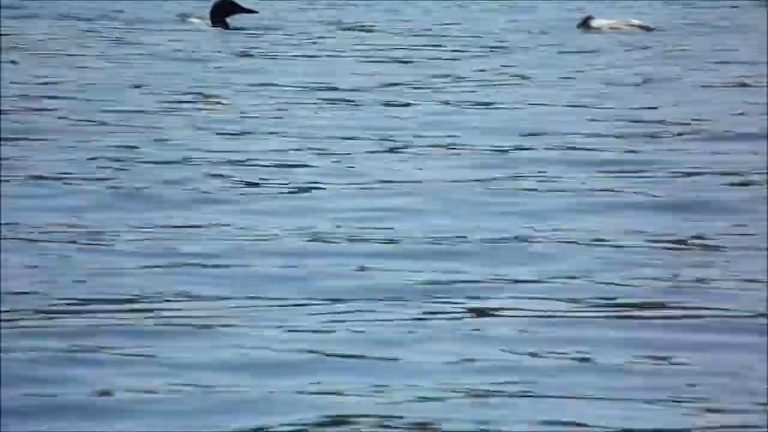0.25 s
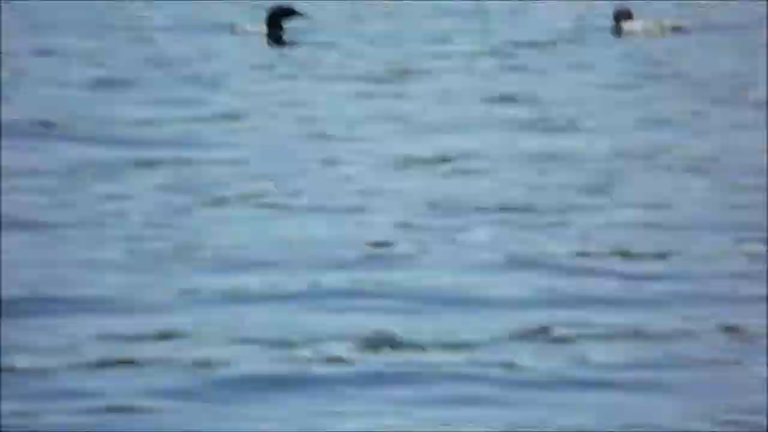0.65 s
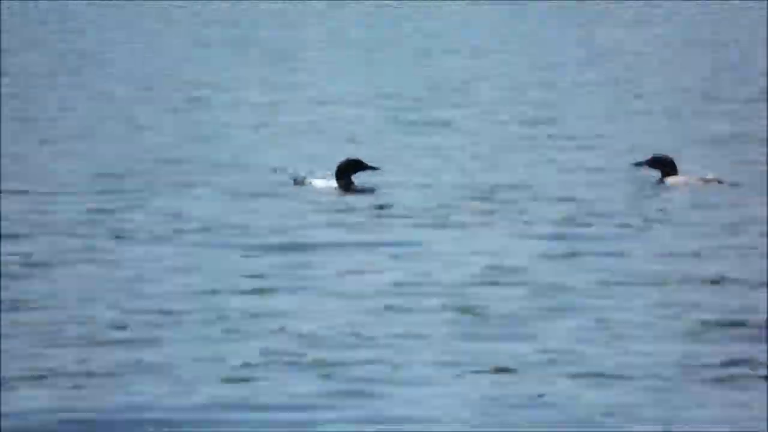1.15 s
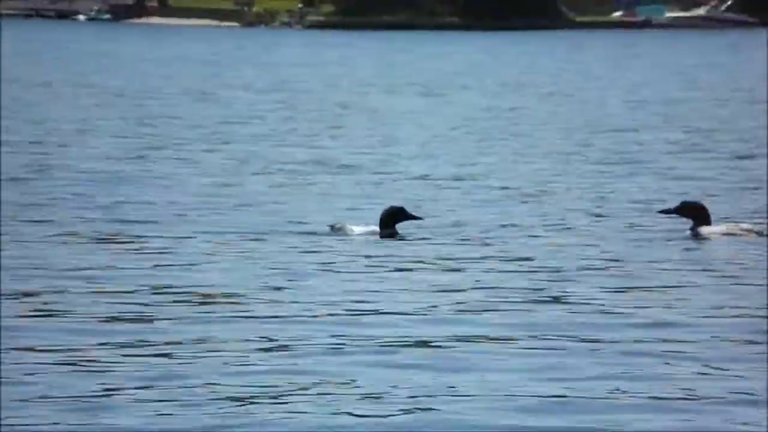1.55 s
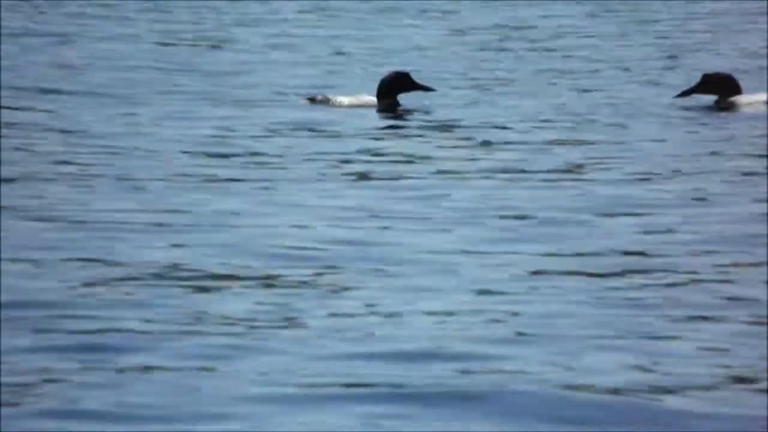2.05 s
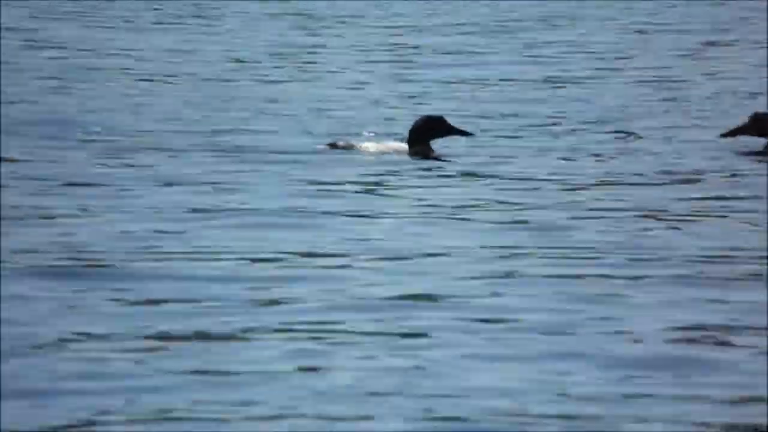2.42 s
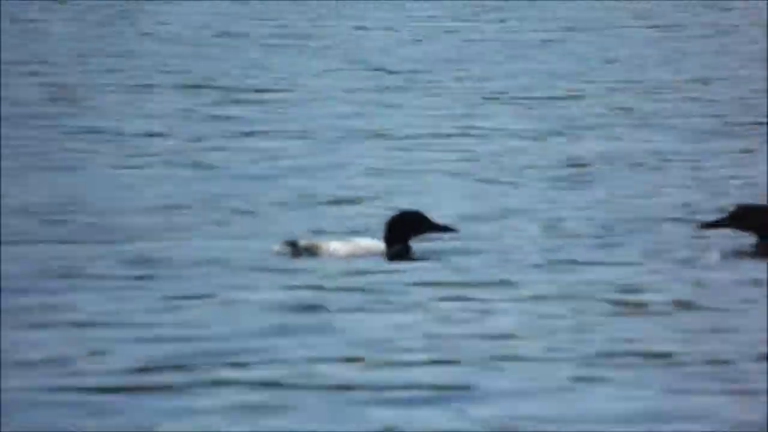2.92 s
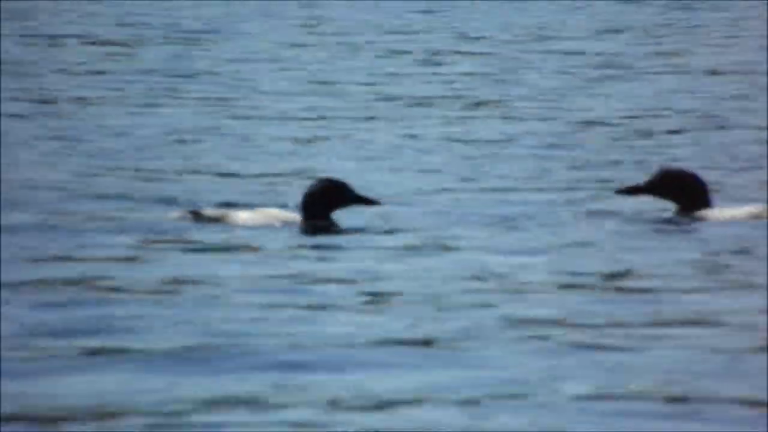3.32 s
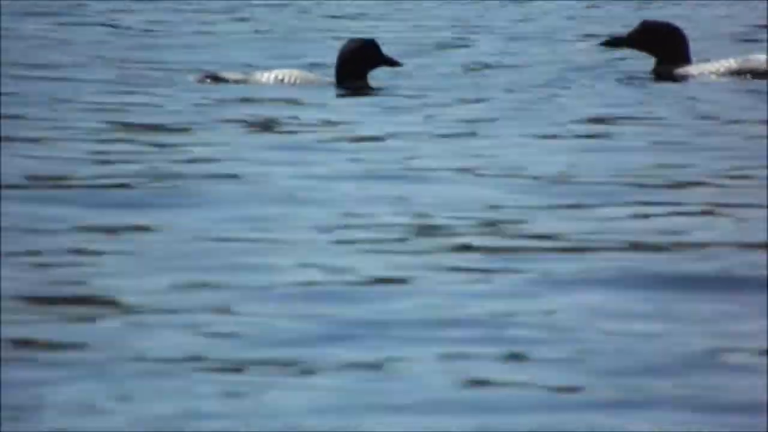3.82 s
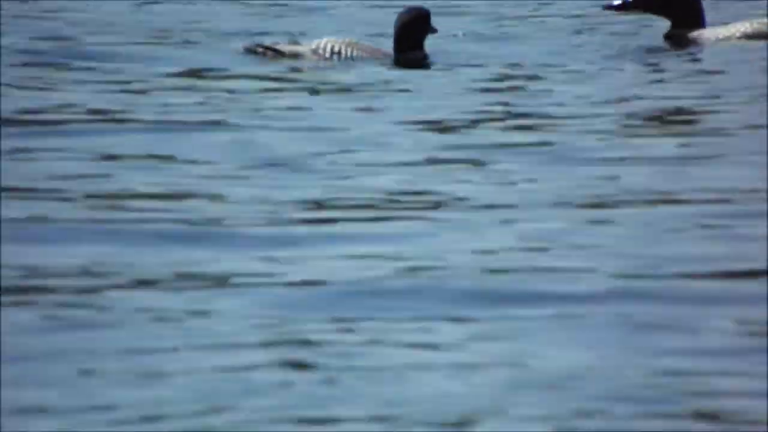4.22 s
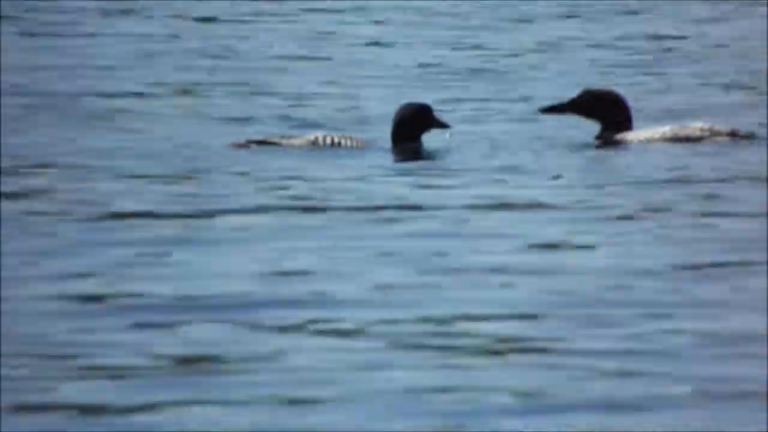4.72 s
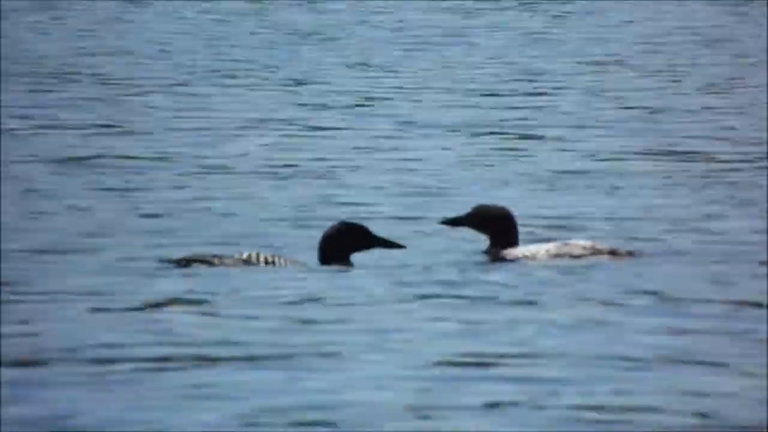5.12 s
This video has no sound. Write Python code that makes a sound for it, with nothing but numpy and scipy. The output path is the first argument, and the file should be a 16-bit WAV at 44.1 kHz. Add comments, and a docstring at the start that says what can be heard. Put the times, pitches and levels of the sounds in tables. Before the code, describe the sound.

Close handling clicks, a buzzing two-second zoom whirr with a throbbing whine, then more sharp clicks above soft electronic hiss.

```python
"""On a boat, a small camera's own microphone: hiss, faint wavering hums and a thin whistle run throughout.
From 0.6 s fingers click the plastic casing (ringing modes), then slide and creak (jerky noise, rows of clicks).
At 1.6 s the zoom jolts and grinds for two seconds (beating noise through resonances), a lens part singing
near 1.2 kHz in throbs. Soft groans, more handling and a low bump follow. No distance or room is added;
one microphone feeds both channels, the left a sample late."""
import sys
import numpy as np
from scipy.fft import rfft, irfft, next_fast_len
from scipy.io import wavfile
from scipy.ndimage import map_coordinates

SR = 44100
rng = np.random.default_rng(int(sys.argv[2]) if len(sys.argv) > 2 else 0)


def transcribe(signal):
    """Save signal, clipped to [-1, 1], as a 16-bit WAV file at the path in sys.argv[1]."""
    frames = np.atleast_2d(signal).T
    limited = np.clip(frames, -1, 1)
    pcm = np.round(limited * 32767).astype(np.int16)
    wavfile.write(sys.argv[1], SR, pcm)


N = 236351
TIME = np.arange(N) / SR  # s


def amp(db):
    """Amplitude factor of a level in dB."""
    return 10 ** (np.asarray(db) / 20)


def unit(x):
    """x scaled to rms 1."""
    return x / np.sqrt(np.mean(x ** 2) + 1e-20)


def sine(turns):
    """Sine of a phase counted in whole turns."""
    return np.sin(2 * np.pi * turns)


def curves(rows):
    """One value per sample for each column after the time."""
    s, *columns = np.transpose(rows)
    return [np.interp(TIME, s, column) for column in columns]


def wobble(rate):
    """A smooth random curve, rate knots a second."""
    knots = rng.standard_normal(int(N * rate / SR) + 4)
    return map_coordinates(knots, [np.arange(N) * rate / SR])


def filtered(x, response):
    """x times a complex response of frequency."""
    m = next_fast_len(N + SR // 2)
    spectrum = rfft(x, m) * response(np.fft.rfftfreq(m, 1 / SR))
    return irfft(spectrum, m)[..., :N]


def colour(points):
    """Gain of (f/Hz, level/dB) points joined on a log frequency axis."""
    f, db = np.transpose(points)
    return lambda hz: amp(np.interp(np.log(hz + 1), np.log(f + 1), db))


def resonance(f, hz, width_hz):
    """One causal resonance of gain 1 at its top."""
    return 1j * f * width_hz / (hz * hz - f * f + 1j * f * width_hz)


def lift(f, peaks):
    """Gain of (f/Hz, width/Hz, level/dB) peaks over a flat response."""
    return 1 + sum((amp(db) - 1) * abs(resonance(f, hz, w)) ** 2 for hz, w, db in peaks)


def noise(response):
    """Noise of rms 1 in the given colour."""
    return unit(filtered(rng.standard_normal(N), response))


# Hiss spectrum: f/Hz, relative level/dB
HISS_COLOUR = [(25, -40), (100, -15), (250, -4.5), (500, -3.5), (800, -1.5), (1300, -6), (1750, -8),
               (2200, -4.5), (2800, -5.5), (3050, -15), (6000, -17.5), (9500, -19), (12000, -19.5),
               (15400, -23)]
# Casing resonances that colour the hiss: f/Hz, width/Hz, level/dB
HISS_RESONANCES = [(2568, 163, 9.5), (3630, 380, 4)]
# Hums, before their wavering: f/Hz, level/dB rms
HUM_TONES = [(308, -71), (772, -75.5), (928, -77.5)]
# Steady whistle: f/Hz, level/dB rms
WHISTLE_TONES = [(9778.7, -64)]
HISS_DB = -59  # rms


def background():
    """Hiss coloured by the casing, wavering hums and the steady whistle of the electronics."""
    hiss = amp(HISS_DB) * noise(lambda f: colour(HISS_COLOUR)(f) * lift(f, HISS_RESONANCES))
    hum = 0
    for hz, db in HUM_TONES:
        level = amp(db + 3.1 * wobble(18)) * np.sqrt(2)
        hum = hum + level * sine(hz * TIME + 0.11 * wobble(14))
    whistle = sum(amp(db) * np.sqrt(2) * sine(hz * TIME) for hz, db in WHISTLE_TONES)
    return hiss + hum + whistle


PULL = .6  # how far a blow draws the nearest mode to its favoured pitch, 0-1


def ring(modes, t, rise, favoured_hz):
    """Modes rise softly and are damped by the grip; the blow favours those near one pitch."""
    struck = 0
    for hz, db, t60 in modes:
        near = np.exp(-(np.log(hz / favoured_hz) / 0.1) ** 2)
        favour_db = 8 * near
        hz = hz * (favoured_hz / hz) ** (PULL * near)
        size, pitch, phase = amp(rng.normal(0, 1.5)), rng.normal(1, .012), rng.normal(0, .25)
        longer_t60 = t60 * amp(0.22 * favour_db)
        decay = amp(db + favour_db - 60 * (t / longer_t60) ** 0.79)
        struck = struck + size * decay * sine(hz * pitch * t + phase)
    struck = struck * (1 - np.exp(-(t / rise) ** 2))
    return struck / np.sqrt(np.mean(struck[t < .008] ** 2))  # rms 1 over the first 8 ms


# Casing clicks, each sounding 1 ms after its time: t/s, level/dB of the upper modes (peak),
# of the middle modes, low modes and bright crack (rms over 8 ms), favoured f/Hz
CASING_CLICKS = [(0.593, -65, -55, -57, -78, 910), (0.7029, -52, -57, -55, -74, 910),
                 (0.8794, -64, -55, -53, -74, 960), (1.028, -23, -32, -38, -63, 2350),
                 (1.3068, -60, -61, -53, -80, 744), (1.3226, -32, -46, -41.5, -70, 725),
                 (1.403, -30.5, -36, -42, -67, 1540), (1.439, -22, -27, -20.5, -38, 780),
                 (1.4934, -38, -42, -54, -62, 1040), (1.513, -25.5, -33, -45, -56.5, 1090),
                 (1.5595, -35, -47.5, -53, -61, 2600), (1.6118, -36, -37, -47, -71, 2550),
                 (1.6297, -18, -23.5, -23.5, -40.5, 1070), (1.6633, -12, -24.5, -31, -47.5, 2530),
                 (1.9828, -25.5, -32, -30, -46, 785), (2.0705, -40, -42, -34, -70, 767),
                 (2.175, -49, -44, -34, -64, 830), (2.9073, -23, -38, -37, -62, 2420),
                 (3.0722, -25, -35.5, -35.5, -57, 1170), (3.1428, -21, -19, -28.5, -50.5, 1195),
                 (3.6366, -29.5, -43.5, -45.5, -58, 2510), (3.895, -52, -64, -51.5, -80, 734),
                 (4.148, -30.5, -32.5, -35.5, -55.5, 1085), (4.2846, -12, -30, -38.5, -38, 2730),
                 (4.318, -41, -45.5, -50, -80, 1420), (4.4566, -12, -20.5, -30.5, -45.5, 1662),
                 (4.603, -45, -54, -52, -72, 910), (4.789, -36, -39, -46, -70, 1380),
                 (4.8479, -38, -44.5, -63, -75, 1610), (4.936, -47.5, -57, -56, -68, 1320),
                 (4.963, -66, -63, -41.5, -77, 890), (5.0091, -46.5, -55, -51, -84, 1850)]
# Modes of the casing, before a blow favours any: f/Hz, relative level/dB, t60/s
LOW_CASING = [(225, -7, 0.05), (337, 4.5, 0.029), (531, -18, 0.18), (678, 14.5, 0.017), (848, 14.5, 0.019)]
MIDDLE_CASING = [(1049, 10, 0.012), (1192, 2.7, 0.032), (1320, 1.7, 0.023), (1502, 0.85, 0.032),
                 (1565, 1, 0.027)]
UPPER_CASING = [(1887, -10.5, 0.02), (2129, -1.5, 0.014), (2357, -4, 0.022), (2618, -0.5, 0.014),
                (2977, -10, 0.019)]
CRACK_CASING = [(3576, 5.5, 0.02), (3950, 9, 0.011), (4550, 7, 0.01), (5170, 3.5, 0.013),
                (6380, 3.5, 0.0086), (8140, 6, 0.004)]
LOW_CUT_HZ = 200


def clicks():
    """Each click shakes four groups of casing modes in its own balance; the thin casing sheds no bass."""
    out, t = np.zeros(N + SR), np.arange(SR // 10) / SR
    for s, upper_db, middle_db, low_db, crack_db, hz in CASING_CLICKS + slips():
        upper = ring(UPPER_CASING, t, 0.0014, hz)
        click = amp(upper_db) * upper / np.abs(upper).max()
        click += amp(low_db) * ring(LOW_CASING, t, 0.00066, hz)
        click += amp(middle_db) * ring(MIDDLE_CASING, t, 0.0014, hz)
        click += amp(crack_db) * ring(CRACK_CASING, t, 0.00073, hz)
        out[round((s + .001) * SR):][:len(t)] += click
    return filtered(out[:N], lambda f: (1j * f / (1j * f + LOW_CUT_HZ)) ** 3)


# Finger strokes on the casing: loudest t/s, rise/s, fall/s, dull slide level/dB, bright scrape level/dB
FINGER_STROKES = [(1.41, .3, 0.11, -67, -64), (1.45, 0.041, 0.06, -46.5, -49), (4.26, 0.16, 0.23, -56, -55),
                  (4.929, 0.31, 0.36, -54.5, -83)]
# Spectrum of the dull slide: f/Hz, relative level/dB
SLIDE_COLOUR = [(40, -23), (300, 9), (900, 8), (1300, 10), (1800, -31), (4000, -61)]
STROKE_SPAN_DB = 20  # what a stroke gains in its rise and loses in its fall


def fingers():
    """Skin slips in small jerks over the plastic, dull or scraping the casing's upper resonance."""
    slide_gain = scrape_gain = 0
    for s, rise, fall, slide_db, scrape_db in FINGER_STROKES:
        shape_db = -STROKE_SPAN_DB * np.maximum((s - TIME) / rise, (TIME - s) / fall)
        slide_gain = slide_gain + amp(slide_db + shape_db)
        scrape_gain = scrape_gain + amp(scrape_db + shape_db)
    jerks = amp(3 * wobble(76))
    slide = unit(jerks * noise(colour(SLIDE_COLOUR)))
    scrape = unit(jerks * noise(lambda f: resonance(f, 2570, 900) ** 2))
    return slide_gain * slide + scrape_gain * scrape


# Creaks, a seam or the gear slack slipping in quick steps: t/s, number of slips, gap/s,
# upper level/dB, middle level/dB, low level/dB, loss/dB per slip, favoured f/Hz
CREAK_ROWS = [(1.3472, 2, 0.017, -37.5, -50.5, -47.5, -1.5, 2470),
              (1.4524, 6, .0068, -34.5, -35.5, -42, 1.5, 1030),
              (1.523, 3, .0126, -38.5, -46.5, -56, 1, 1100), (1.6978, 5, 0.012, -38, -50, -74, 2, 2550)]
SLIP_CRACK_DB = -29  # bright crack relative to the upper modes


def slips():
    """Each creak is a row of fading or growing, slightly uneven clicks."""
    rows = []
    for s, count, gap, upper_db, middle_db, low_db, loss_db, hz in CREAK_ROWS:
        for k in range(round(count)):
            uneven = k > 0  # the first slip is exact
            late = (k + uneven * rng.normal(0, .04)) * gap
            db = -loss_db * k + uneven * rng.normal(0, 1.5)
            crack_db = upper_db + db + SLIP_CRACK_DB
            rows.append((s + late, upper_db + db, middle_db + db, low_db + db, crack_db, hz))
    return rows


# Gain of the steady singing: t/s, level/dB
SINGING_LEVEL = [(1.7, -91), (1.9, -44.5), (2.3, -51), (2.8, -45), (3.15, -50.5), (3.3, -32.5),
                 (3.42, -46.5), (3.48, -37.5), (3.55, -50.5), (3.6, -40.5)]
START_S, STOP_S, REST_S = 1.61, 3.487, 3.638  # motor starts, loses power, lens comes to rest
JOLT_DB, JOLT_FADE_DB_PER_S = -26.5, 185  # the gears take up their slack loudly
RUN_DB, COAST_DB = -38.5, -56.5  # gear noise under power and while coasting
SPIN_UP_S, SPUN_UP_S = 1.725, 1.75  # the steady gear noise rises between these times
EDGE_S, REST_FADE_DB_PER_S = 0.005, 600  # length of abrupt changes; the last fade
RUB_DB, RUB_FOLLOWS = -46, 0.24  # rubbing at the loudest singing; share of the singing's dB swings
RUB_JOLT_DB = -10  # rubbing relative to the jolt


def motor():
    """Gear, singing and rubbing gains: a jolt, a spin-up, a steady run, a coast and the rest."""
    ramp = lambda s, length: np.clip((TIME - s) / length, 0, 1)
    moving = ramp(START_S, EDGE_S) * amp(-REST_FADE_DB_PER_S * np.maximum(TIME - REST_S, 0))
    jolt = amp(JOLT_DB - JOLT_FADE_DB_PER_S * np.maximum(TIME - START_S, 0))
    run_db = RUN_DB + (COAST_DB - RUN_DB) * ramp(STOP_S, EDGE_S)
    run = amp(run_db) * ramp(SPIN_UP_S, SPUN_UP_S - SPIN_UP_S)
    sing_db, = curves(SINGING_LEVEL)
    rub = amp(RUB_DB + RUB_FOLLOWS * (sing_db - sing_db.max())) + amp(RUB_JOLT_DB) * jolt
    return moving * (jolt + run), moving * amp(sing_db), moving * rub


# Barrel resonances shaken by the gears: f/Hz, width/Hz, level/dB
GEAR_RESONANCES = [(1196, 154, -5), (1643, 58, -5.5), (1784, 33, -12), (2405, 109, -2), (2553, 126, -8.5),
                   (2898, 118, -8), (3800, 106, -30.5), (4630, 59, -26)]


def barrel(f):
    """Resonances of alternating sign, each narrow one shaped by one six times as wide."""
    response = 0
    for k, (hz, width, db) in enumerate(GEAR_RESONANCES):
        response = response + (-1) ** k * amp(db) * resonance(f, hz, width) * resonance(f, hz, 6 * width)
    return response


# Gear beats, before a small wander: t/s, beats per second
BEAT_RATE = [(2.3, 98.5), (2.45, 93), (3.25, 93.5), (3.45, 98)]
# Broad gear noise: f/Hz, relative level/dB
GRIND_COLOUR = [(60, -39), (900, -18.5), (2000, -3.5), (3000, -10), (3400, -15.5), (5500, -32.5),
                (9000, -32), (15000, -73)]
# Gear tone, one row: f/Hz, level/dB relative to the gear noise, depth of its pulsing with the beats (0-1)
GEAR_WHINE = (2420, -14, .7)
# Low rubbing: f/Hz, relative level/dB
RUB_COLOUR = [(40, -41), (200, -13.5), (420, -11.5), (900, -11), (1050, -25), (1500, -45.5)]
# Hollows of the barrel: f/Hz, width/Hz, level/dB
BARREL_HOLLOWS = [(512, 87, 7.5), (710, 125, 8)]
RUB_THROB_DB = -25.5  # each throb shakes the barrel too


def zoom_drive():
    """Gear teeth rattle in beats into the lens barrel; one part sings; the barrel rubs low."""
    gear_gain, sing_gain, rub_gain = motor()
    turns = np.cumsum(curves(BEAT_RATE)[0] * (1 + .025 * wobble(30))) / SR  # one turn a beat
    beat = .5 + np.exp(-3 * (turns % 1)) * amp(1.5 * wobble(90))  # starts sharply and fades
    rattle = beat * rng.standard_normal(N)
    knocks = np.diff(np.floor(turns), prepend=0) * amp(1.5 * wobble(90))  # one firm contact a beat
    teeth = unit(rattle) + amp(-7) * unit(knocks)
    # the next wheel chatters twice in three beats
    chatter = (1 + .55 * sine(turns * 2 / 3)) * amp(2.5 * wobble(250))
    grind = unit(chatter * filtered(rattle, colour(GRIND_COLOUR)))
    gears = unit(unit(filtered(teeth, barrel)) + amp(-9.0) * grind)
    whine_hz, whine_db, depth = GEAR_WHINE
    whine = sine(np.cumsum(whine_hz * (1 + .012 * wobble(25))) / SR)
    pulsing = 1 + depth * np.cos(2 * np.pi * turns)
    gears = unit(gears + amp(whine_db) * unit(whine * pulsing))
    rub_noise = noise(lambda f: colour(RUB_COLOUR)(f) * lift(f, BARREL_HOLLOWS))
    rubbing = unit(amp(2 * wobble(50)) * rub_noise)
    rub_gain = rub_gain + amp(RUB_THROB_DB) * throbs()
    return gear_gain * gears + singing(sing_gain, turns) + rub_gain * rubbing


SING_HZ, SING_WIDTH_HZ = 1179, 24


def singing(level, turns):
    """A wandering tone sings and throbs; narrow noise, slightly stronger, roughens the steady singing."""
    tone = sine(np.cumsum(SING_HZ * (1 + 0.00589 * wobble(40))) / SR)
    rough = noise(lambda f: resonance(f, SING_HZ, SING_WIDTH_HZ) * resonance(f, SING_HZ, 300))
    steady = unit(amp(6.7 * wobble(29.8)) * tone) + amp(2) * rough
    flutter = 1 + .4 * sine(turns / 3)  # once in three beats
    return level * unit(steady * flutter) + throbs() * tone


# Throbs of the singing part, before the damping at rest: start t/s, peak level/dB
SINGING_THROBS = [(2.328, -31.5), (2.62, -34.5), (2.865, -27.5), (2.933, -24), (2.963, -28), (2.996, -25.5),
                  (3.075, -29), (3.128, -27.5), (3.193, -27), (3.239, -26), (3.267, -24.5), (3.292, -29.5),
                  (3.461, -31), (3.516, -43), (3.563, -33.5), (3.628, -31.5)]
REST_DAMP_DB = -12  # the stop damps the singing part at once


def throbs(rise=0.0086, t60=0.075):
    """The singing part swells within milliseconds and rings out: its peak size over time."""
    swells, t = np.zeros(N + SR), np.arange(SR // 4) / SR
    swell = np.sin(np.pi / 2 * np.clip(t / rise, 0, 1)) ** 2
    shape = swell * amp(-60 * np.maximum(t - rise, 0) / t60)
    for s, db in SINGING_THROBS:
        swells[round(s * SR):][:len(t)] += amp(db) * shape
    return amp(REST_DAMP_DB * (TIME > REST_S)) * swells[:N]


# Short soft tones, before their unsteadiness: middle t/s, half length/s, f/Hz, peak level/dB
SOFT_GROANS = [(3.194, 0.0043, 760, -34.5), (3.607, 0.018, 285, -42.5), (4.912, 0.003, 450, -43),
               (4.954, 0.0025, 340, -40), (4.956, 0.0038, 885, -32)]


def groan():
    """Barrel or grip presses the casing: each soft tone swells and fades."""
    unsteady = amp(4 * wobble(150))
    tones = 0
    for s, half, hz, db in SOFT_GROANS:
        tones = tones + amp(db) * np.exp(-((TIME - s) / half) ** 2) * sine(hz * TIME)
    return unsteady * tones


# Grip shift, one row: middle t/s, half length/s, f/Hz, level/dB before its lumps
GRIP_BUMP = (4.97, .07, 110, -62)


def bump():
    """The grip shifts: a short swell of lumpy low noise."""
    s, half, hz, db = GRIP_BUMP
    rumble = noise(lambda f: resonance(f, hz, 1.9 * hz))
    swell = np.exp(-((TIME - s) / half) ** 2)
    return amp(db + 4.6 * wobble(27)) * swell * rumble


def scene():
    """All sounds at one microphone, fed to both channels with the left a sample late."""
    mono = background() + clicks() + fingers() + zoom_drive() + groan() + bump()
    return np.array([np.roll(mono, 1), mono])


CEILING = .36  # amplitude that the soft clipping approaches
NOTCH_HZ, NOTCH_WIDTH_HZ, TOP_HZ = 6992, 90, 15650


def record(dry):
    """The loudest clicks clip softly; a narrow notch near 7 kHz, and nothing above TOP_HZ."""
    clipped = dry / (1 + np.abs(dry / CEILING) ** 6) ** (1 / 6)
    return filtered(clipped, lambda f: (1 - resonance(f, NOTCH_HZ, NOTCH_WIDTH_HZ)) * (f < TOP_HZ))


dry = scene()
out = record(dry)
transcribe(out)
```